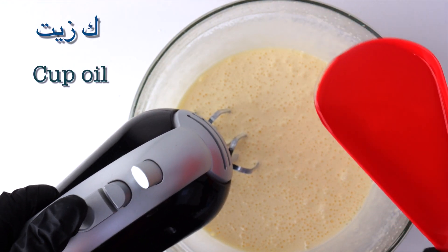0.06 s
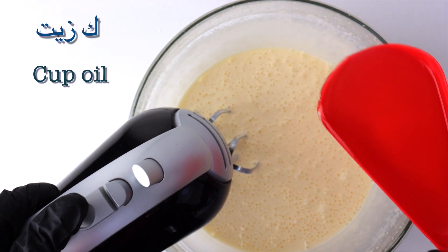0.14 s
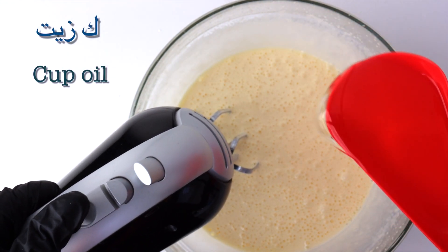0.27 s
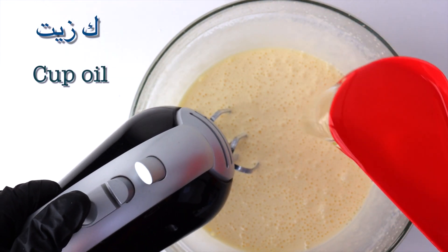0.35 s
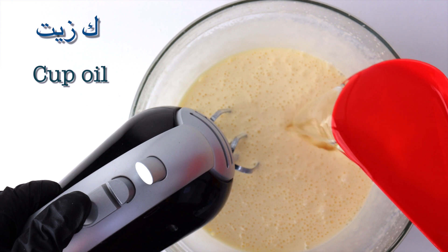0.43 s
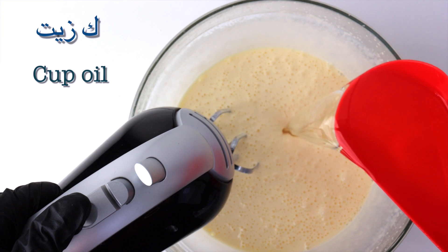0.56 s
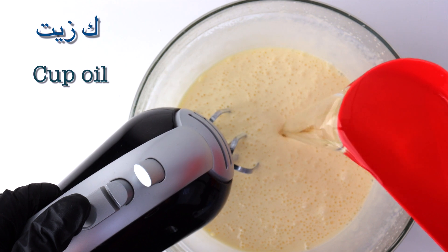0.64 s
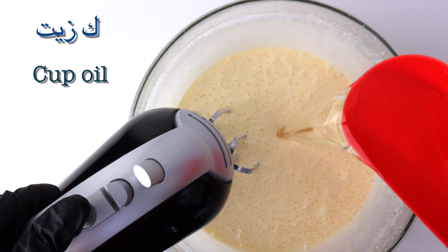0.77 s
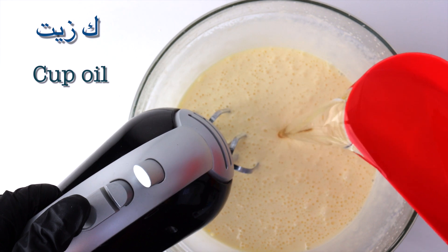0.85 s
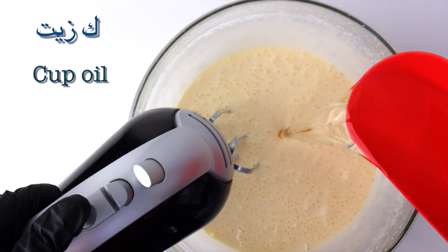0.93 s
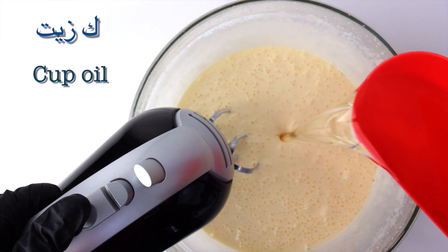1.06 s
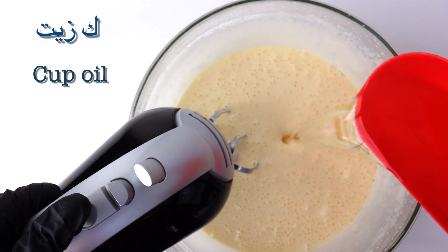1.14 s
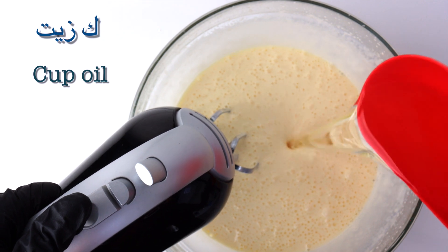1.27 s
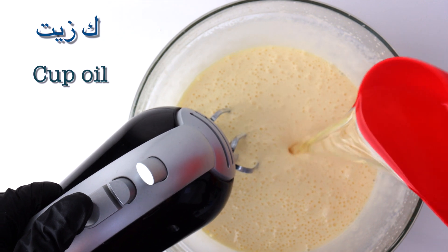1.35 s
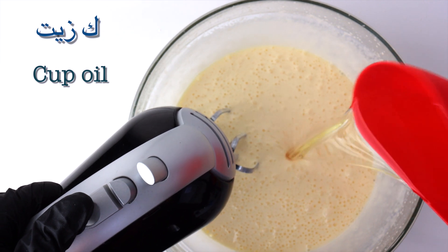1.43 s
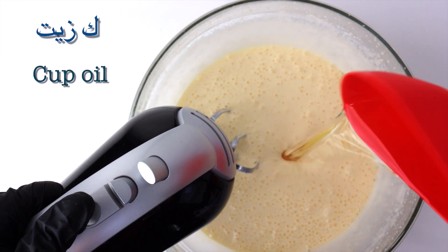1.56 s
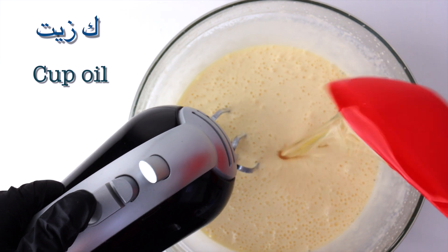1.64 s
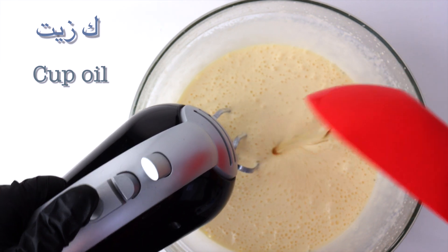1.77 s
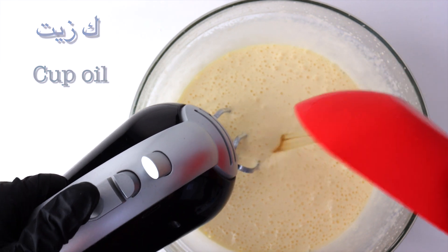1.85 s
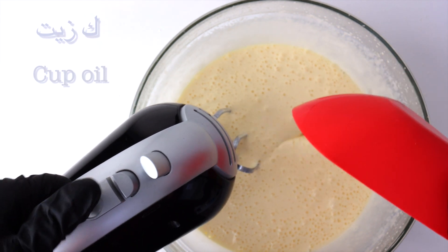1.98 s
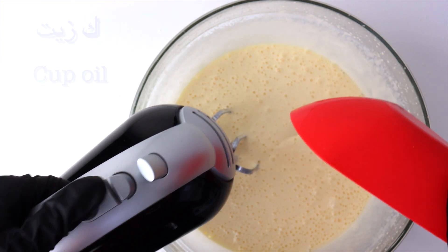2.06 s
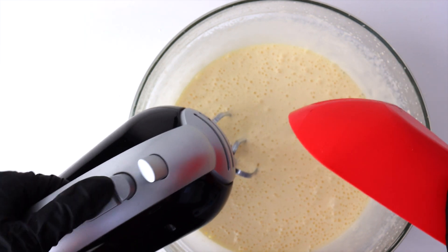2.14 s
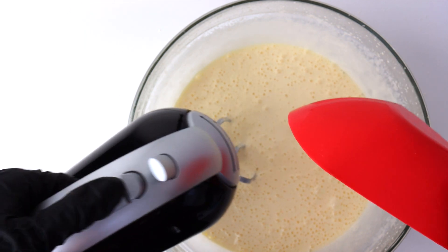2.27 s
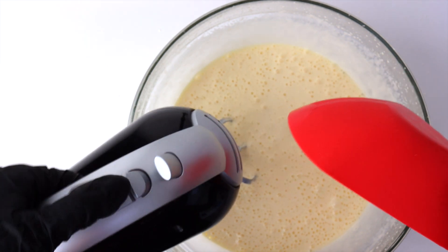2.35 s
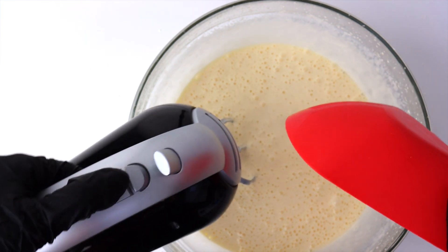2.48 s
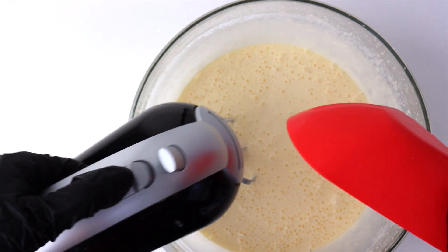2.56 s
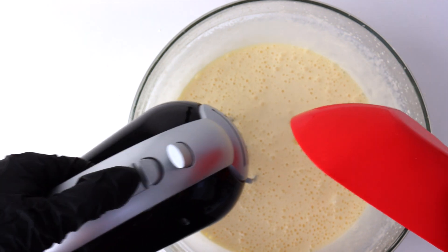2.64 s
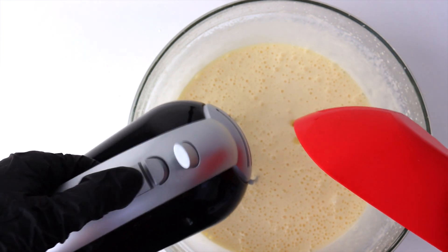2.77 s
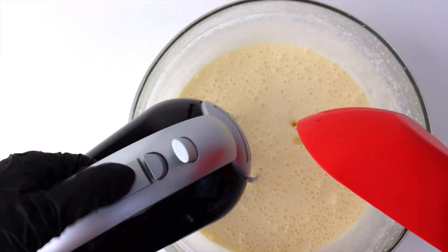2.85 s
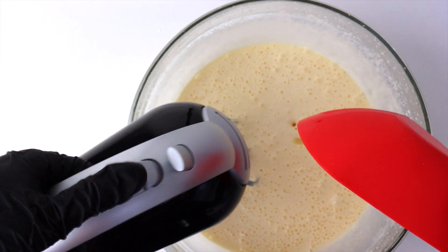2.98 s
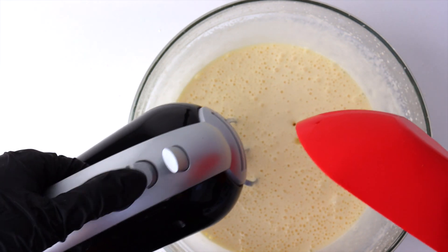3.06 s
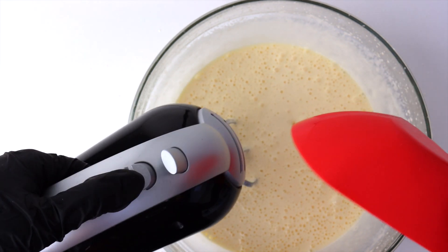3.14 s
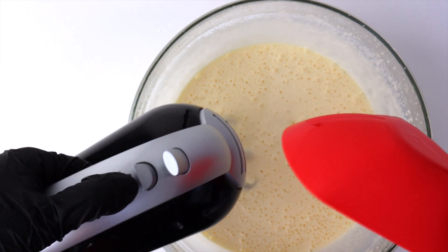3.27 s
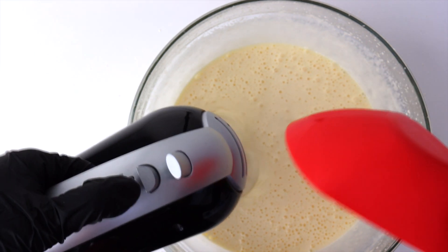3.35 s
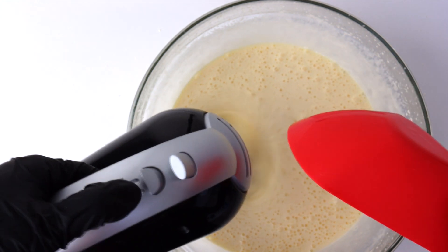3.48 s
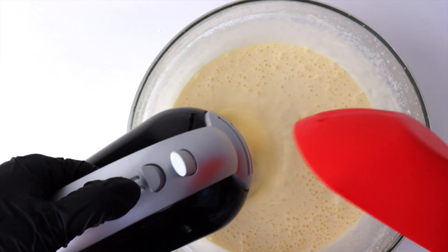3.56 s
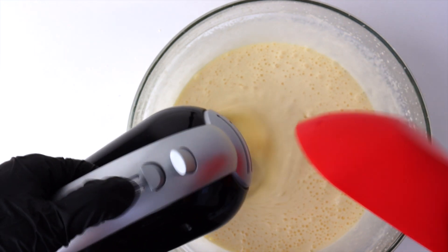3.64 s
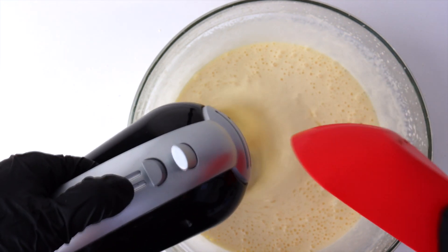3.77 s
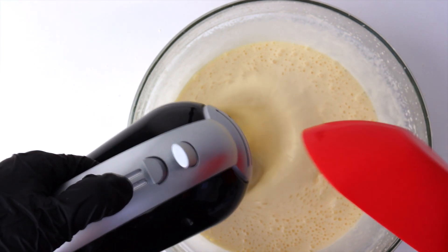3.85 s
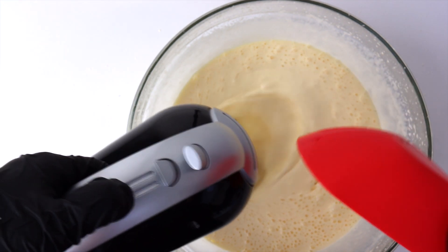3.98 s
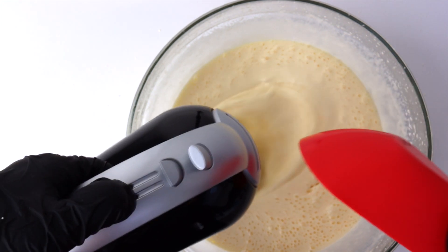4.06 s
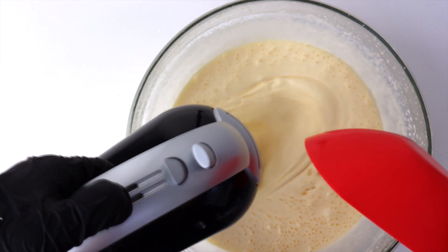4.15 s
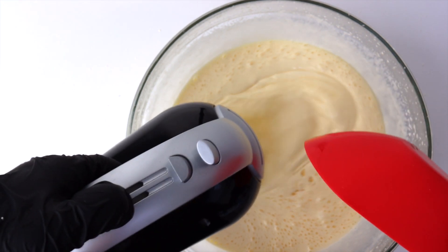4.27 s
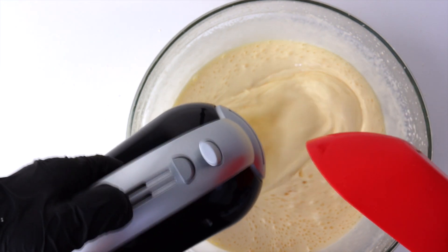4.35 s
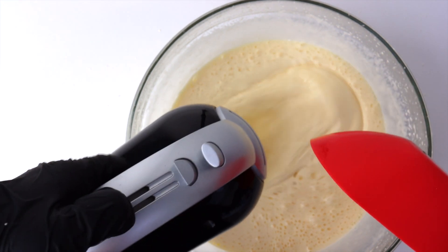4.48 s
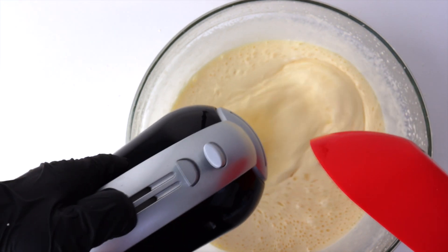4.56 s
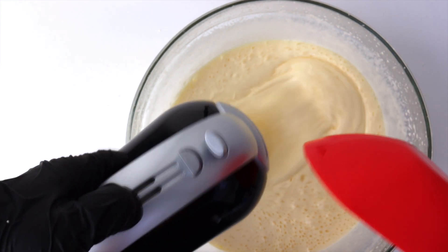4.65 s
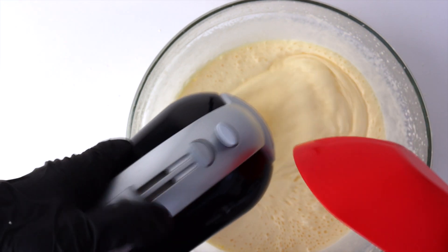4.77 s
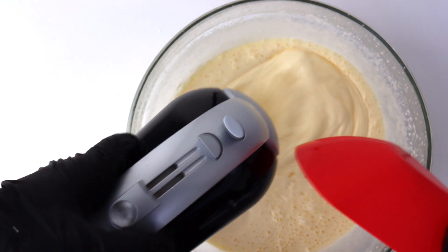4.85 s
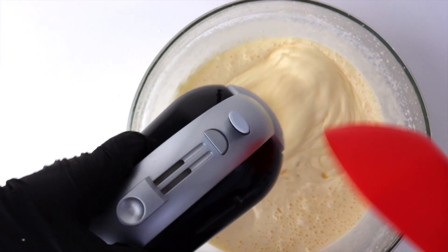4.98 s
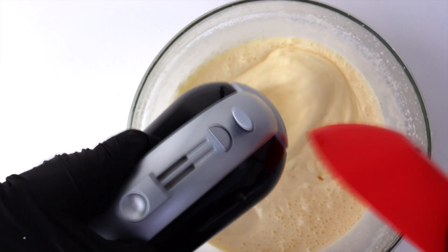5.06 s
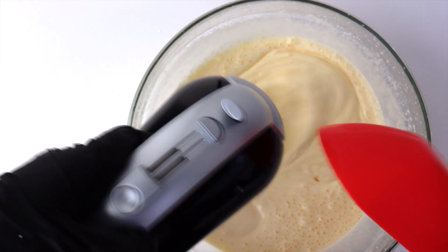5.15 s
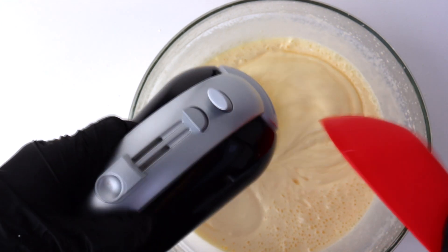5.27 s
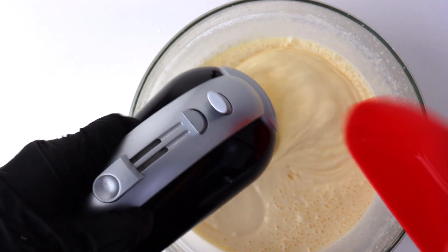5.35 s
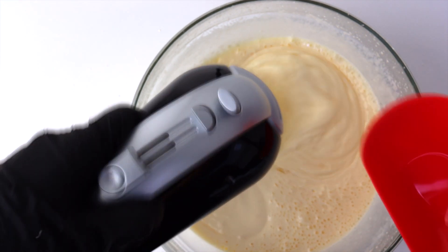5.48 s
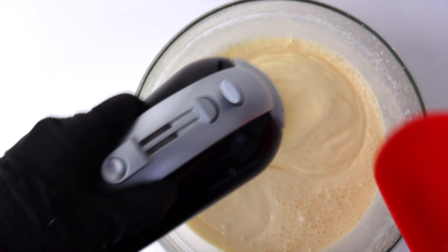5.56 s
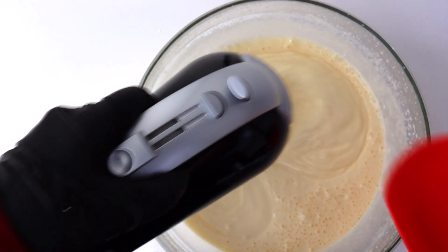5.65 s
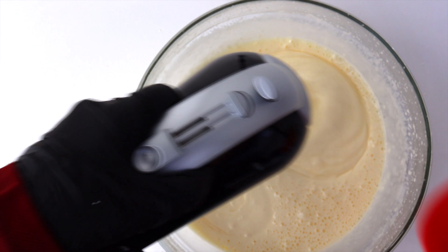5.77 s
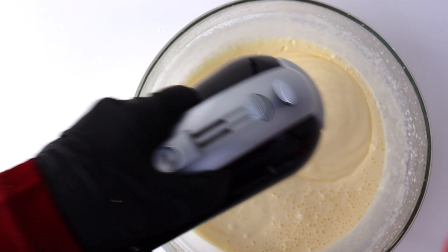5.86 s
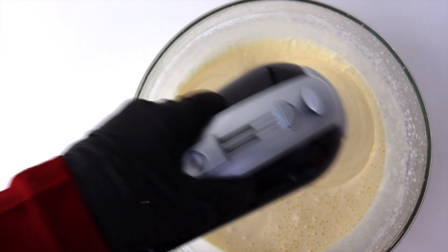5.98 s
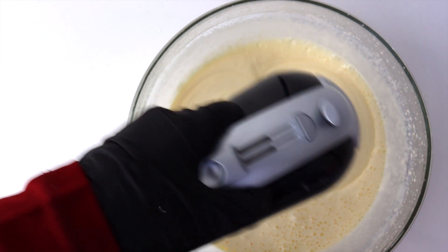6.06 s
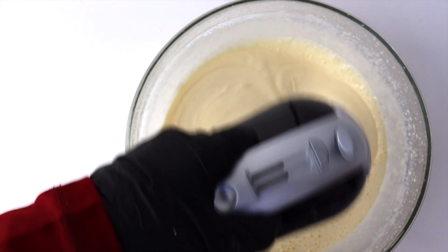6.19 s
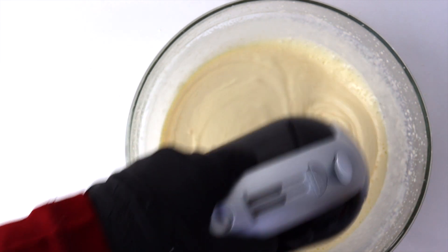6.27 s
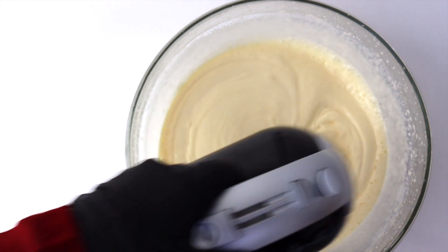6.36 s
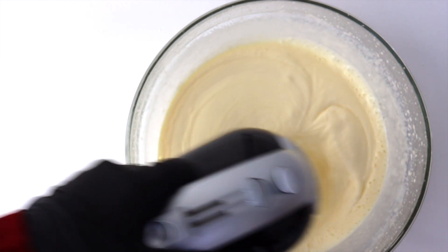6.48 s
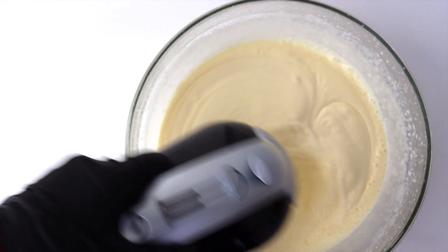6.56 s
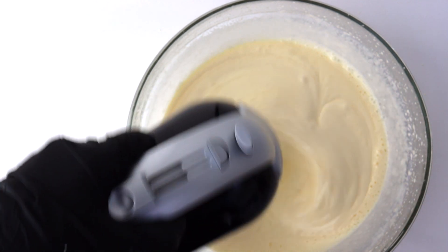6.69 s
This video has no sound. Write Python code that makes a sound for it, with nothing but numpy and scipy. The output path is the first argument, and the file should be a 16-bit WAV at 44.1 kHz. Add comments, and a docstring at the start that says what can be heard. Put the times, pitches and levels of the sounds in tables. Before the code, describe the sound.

A small, hard-walled kitchen heard close up, nearly quiet at first, with faint air noise and a low steady hum. A tiny tap and soft swish come near 0.5 s, then brief rustles at 1.1 and 1.3 s. Dull low glugs of poured oil follow around 1.4-1.7 s. Light plastic taps cluster at 2.2-3 s, the clearest near 2.6, with faint gurgles. At 3.2-3.3 s a switch snaps hard and the mixer bursts in, far louder. It sags briefly around 3.6, clicks again at 3.7, 3.95 and 4.1, and climbs with passing squeals, dips near 4.3, then rises toward a steady high whine with rushing, raspy fan noise. Batter thuds and rumbles beneath; beaters clatter on glass in fast runs, notably at 4.5, 4.85, 5.3, 5.6, 6 and 6.4 s. The motor is still running at the end.

```python
"""A small kitchen with a low hum, heard close up: oil is poured into batter in a glass bowl, then a hand mixer runs.
Short rustling swishes and plastic taps are shaped noise; the glugs of pouring are decaying low tones.
The mixer is clicked on and slid up through its speeds; its motor whines on multiples of its rotation.
Fan and brushes rasp as noise pulsing once a turn; geared-down beaters excite resonances of batter and glass."""
import sys
import numpy as np
from scipy import signal
from scipy.fft import rfft, irfft
from scipy.io import wavfile
from scipy.ndimage import uniform_filter1d

SR = 44100
rng = np.random.default_rng(int(sys.argv[2]) if len(sys.argv) > 2 else 0)


def wav_out(sig):
    """Save sig, one row per channel (or a flat mono array), as 16-bit PCM at SR to the path in sys.argv[1]."""
    wavfile.write(sys.argv[1], SR, np.round(np.clip(np.atleast_2d(sig).T, -1, 1) * 32767).astype(np.int16))


N = 296352
T = np.arange(N) / SR

# motor slider steps; the speed sags where the contact breaks: start_s, target_speed_hz, lag_s
SPEED_STEPS = [(3.28, 186, .085), (3.6, 165, .1), (3.7, 238, .1), (3.89, 276, .18), (4.12, 310, .155),
               (4.29, 280, .07), (4.385, 395.5, .45)]
# radiation of the motor tones by the housing: frequency_hz, gain_db
HOUSING_RESPONSE = [(1000, 0), (2900, 0), (3150, 5), (3400, 9), (3490, 8), (3560, 1), (3900, -1), (9300, 1),
                    (11000, -2), (14000, -12)]
# worm gear and bearing overtones: multiple_of_rotation, level_db
GEAR_OVERTONES = [(4, -43), (8, -42), (9, -38.5), (13, -45), (14, -48), (15, -46), (18, -43), (19, -51),
                  (20, -47), (21, -47), (22, -49), (23, -42), (25, -51), (26, -52), (27, -50), (30, -51)]
# commutator note: multiple_of_bar_rate, level_db, timing_roughness_turns
COMMUTATOR_TONES = [(1, 0, .009), (2, -3, .003), (3, -5, .004)]
# commutator tones meeting a resonance: multiple_of_bar_rate, motor_speed_hz, half_width_hz, boost_db
SQUEAL_SPEEDS = [(1, 174, 5, 13), (1, 220.5, 5, 29), (1, 290, 6, 13), (2, 322, 28, 11), (2, 382, 8, 9),
                 (3, 298, 24, 10)]
# radiation of the unbalance hum by the body: motor_speed_hz, level_db
UNBALANCE_RESPONSE = [(150, -42), (250, -38), (310, -25), (350, -22.5), (379, -21.5), (391, -28)]
# housing panel kept ringing by the running motor: frequency_hz, width_hz, gain_db
PANEL_MODES = [(2636, 14, 0)]
# spectrum of fan and brush noise: frequency_hz, density_db_per_hz
RASP_SPECTRUM = [(240, -20.5), (400, -8.5), (425, -3), (588, -2), (777, -12), (1040, -4), (1490, -3.5),
                 (2800, -11.5), (3420, -4.5), (3930, -10.5), (5270, -11.5), (8240, -22), (9320, -20),
                 (14400, -47), (16000, -45)]
# beaters on glass, resonances: frequency_hz, width_hz, gain_db
BEATER_MODES = [(936, 40, -6), (1076, 60, 4), (1260, 100, -9), (1520, 90, -1), (1800, 160, -8),
                (2080, 100, -2), (2400, 200, -8), (3350, 250, -11), (4100, 200, -9), (5200, 500, -17),
                (6950, 150, -10)]
# bowl of batter, resonances: frequency_hz, width_hz, gain_db
BATTER_MODES = [(110, 20, -3), (186, 26, 5.5), (230, 14, 2.5), (281, 30, -1), (312, 45, 1),
                (410, 27, -16.5), (441, 27, -9), (610, 120, -9)]
# chatter as the beaters are pushed around the bowl, relative to RATTLE_DB: time_s, level_db
CHATTER_LEVELS = [(3.36, -24), (3.65, -36), (3.85, -18), (4.4, -17), (4.85, -13), (5.1, -17), (5.35, -16.5),
                  (5.7, -17), (5.95, -44), (6.4, -33), (6.72, -40)]
# churning as the beaters move through the batter, shared by thuds and rumble: time_s, level_db
CHURN_LEVELS = [(3.32, -27.5), (3.39, -28.5), (3.4, -16.5), (3.57, -16.5), (3.59, -20.5), (4.2, -20.5),
                (4.26, -19.5), (4.3, -22), (5.0, -20.5), (5.13, -35.5), (5.32, -21.5), (5.57, -27),
                (5.6, -21.5), (5.9, -28), (6.34, -27.5), (6.41, -23.5), (6.67, -33.5), (6.72, -49)]
# spells of beaters on glass: start_s, length_s, peak_db (nominal), favoured_hz, every_second_blade_db
GLASS_CONTACTS = [(3.336, .03, -13, 1120, 0), (3.431, .07, -14, 1800, 0), (3.538, .13, -9.5, 2000, -2),
                  (3.78, .08, -14, 2640, 0), (3.892, .02, -8, 955, 0), (4.004, .06, -10, 1400, -1),
                  (4.354, .02, -8.5, 1030, 0), (4.506, .33, -11, 1100, 0), (4.851, .14, -5.5, 940, -7),
                  (5.284, .215, -7.5, 1080, -1.5), (5.592, .24, -7, 1060, -4), (5.988, .27, -11, 1520, -7),
                  (6.361, .1, -11.5, 2080, -5)]
# speed switch snapping over its detents: start_s, peak_db, tilt_db_per_octave, decay_s
SWITCH_SNAPS = [(3.208, -21.5, 0, .004), (3.275, -22, -1.5, .005), (3.2795, -4, -1.5, .003),
                (3.3037, -7, .5, .004), (3.3057, -1.5, .5, .004), (3.711, -5, 1.5, .005),
                (3.952, -12, 4, .003), (4.137, -12.5, 5, .0025)]
# spectrum of a switch snap: frequency_hz, density_db_per_hz
SNAP_SPECTRUM = [(180, -43), (300, -39), (593, -8), (978, -21), (1140, -7), (1410, -2), (2000, -14),
                 (3400, -6), (4670, -13.5), (5160, -8), (7440, -21), (11900, -22), (16000, -36)]
# light plastic taps from cup and handle: start_s, peak_db, tilt_db_per_octave, decay_s
PLASTIC_TAPS = [(.424, -31, 20.5, 0.0022), (.532, -40, 5.5, 0.0064), (1.928, -44, 25, 0.0013),
                (2.24, -36.5, 13, 0.008), (2.267, -24, 9, .012), (2.381, -47, -5, .004),
                (2.433, -42, -4.5, 0.012), (2.565, -41.5, -4, 0.0064), (2.613, -19, 7, 0.0046),
                (2.628, -27.5, 0, .011), (2.803, -42, 2, 0.015), (2.848, -49, 5, 0.023),
                (2.963, -49, 7, 0.0074)]
# spectrum of a plastic tap: frequency_hz, density_db_per_hz
TAP_SPECTRUM = [(240, -38), (400, -16), (660, 13.5), (828, -4), (1160, 10.5), (1310, 4), (2320, 8),
                (2700, 0.5), (3770, 1), (4130, -8), (6420, -14), (9520, -31), (15000, -49)]
# short swishes, like a rustling sleeve: start_s, level_db, rise_s, hold_s, decay_s, tilt_db_per_octave, resonance_hz
SWISHES = [(0.493, -45, 0.042, 0.046, 0.053, -1.5, 650), (1.112, -42, .01, 0.047, 0.061, 1.5, 2900),
           (1.319, -36, 0.012, 0.069, 0.072, 6, 5100), (1.386, -40.5, 0.0078, 0.046, 0.068, -3, 2300),
           (1.674, -59, 0.028, 0.079, 0.031, 0, 3300)]
# spectrum of a swish: frequency_hz, density_db_per_hz
SWISH_SPECTRUM = [(290, -39), (500, -5.5), (718, -0.5), (1120, -6), (1270, 2.5), (1830, -2), (2250, 1.5),
                  (4050, -2.5), (4790, -8), (6500, -20), (9090, -29.5), (14000, -51)]
# spells of dull gurgling: start_s, length_s, level_db, level_change_db, start_pitch_hz, end_pitch_hz
GURGLE_SPELLS = [(1.38, .14, -32.5, 4, 247.6, 210), (1.434, .2, -34.5, -0.5, 117, 111.5),
                 (1.55, 0.094, -39, -17, 302, 272), (2.27, 0.065, -41.5, -2, 229, 205),
                 (2.88, 0.048, -34.5, -3, 149.4, 142), (2.912, 0.051, -40.5, 2.5, 298, 394),
                 (3.091, .02, -41, 0, 171, 176)]
# spectrum of the kitchen air: frequency_hz, density_db_per_hz
AIR_SPECTRUM = [(47, 5.5), (80, 0), (152, -4), (194, -1.5), (316, -4.5), (471, -6), (702, -9.5),
                (839, -9.5), (1250, -8.5), (1950, -18), (7050, -29), (14000, -31), (16000, -39)]
# low kitchen hum: time_s, rms_db
HUM_LEVELS = [(0, -50.5), (1.5, -51), (2.1, -53), (3.2, -53), (4.5, -60)]

TURNS_PER_BLADE = 10.75
BARS = 12  # commutator bars passing the brushes each turn
FULL_SPEED_HZ = 395
# levels at full speed (dB) and their change with speed (dB per octave);
# brush tone and panel ring weaken as speed rises
AIR_DB, AIR_SLOPE_DB = -29.5, 3
SPARK_DB, SPARK_SLOPE_DB = -37.5, 2.5
GEAR_DB, GEAR_SLOPE_DB = 0, 9
BRUSH_DB, BRUSH_SLOPE_DB = -45, -8
PANEL_DB, PANEL_SLOPE_DB = -48, -8.5
# rumble relative to the churning (dB), and its change with speed (dB per octave)
RUMBLE_DB, RUMBLE_SLOPE_DB = -21.5, -7.5
# offsets to the level tables; brush change while the motor coasts (dB)
CHURN_DB, RATTLE_DB, COASTING_DB = 3.5, -6.5, -9
# unbalance hum offset and waver (dB); gear timing roughness (turns)
UNBALANCE_DB, UNBALANCE_WAVER_DB, GEAR_ROUGH_TURNS = -1, 1.5, .002
# spread of knock strength (dB); scrape decay and hold (s); top of the ring (Hz)
KNOCK_SCATTER_DB, KNOCK_DECAY_S, KNOCK_HOLD_S, KNOCK_TOP_HZ = 1.5, 0.0044, 0.0046, 8800
# glugs within a spell: rate (per s), decay (s), spread of pitch (octaves) and of strength (dB)
GLUGS_PER_S, GLUG_DECAY_S, GLUG_SCATTER_OCTAVES, GLUG_SCATTER_DB = 27, 0.036, 0.062, -0.5
# kitchen air level (dB), appliance hum pitch and low-pass corner (Hz)
KITCHEN_DB, KITCHEN_HUM_HZ, TOP_HZ = -55.5, 48.3, 15900


def mixer():
    """Common drive: one shaft phase times the motor sounds and, through a worm gear, the blades."""
    speed, coasting = motor_speed()
    octaves = np.log2(np.maximum(speed / FULL_SPEED_HZ, .4))
    churn_db, = curves(CHURN_LEVELS)
    turns = np.cumsum(speed * (1 + .0006 * walk(25))) / SR
    blade = turns / TURNS_PER_BLADE
    power = np.clip((T - 3.305) / .01, 0, 1)
    shaking = rumble(blade, octaves, churn_db)
    motor = whine(turns, speed, octaves, coasting) + rasp(turns, octaves)
    return power * (motor + rattle(blade) + churn(blade, churn_db) + shaking) + knocks(blade)


def motor_speed():
    """Exponential relaxation: speed closes in on each step's target, coasting when the target is lower."""
    speed, goal = np.zeros((2, N))
    for s, hz, lag in SPEED_STEPS:
        i = int(s * SR)
        speed[i:] = hz + (speed[i] - hz) * np.exp(-T[:N - i] / lag)
        goal[i:] = hz
    coasting = uniform_filter1d((goal < speed) * 1., size=SR // 20)
    return speed, coasting


def whine(turns, speed, octaves, coasting):
    """Rotational harmonics: unbalance once a turn, commutator at the bar rate, gear at shaft multiples."""
    # the brushes bounce, which roughens their note in timing and strength
    bounce = walk(220)
    commutator = np.zeros(N)
    for multiple, db, rough in COMMUTATOR_TONES:
        tone = partials(turns + rough * bounce, [(multiple * BARS, db)])
        commutator += squeal(multiple, speed) * tone
    commutator *= undb(BRUSH_DB + BRUSH_SLOPE_DB * octaves + COASTING_DB * coasting + 2 * walk(160))

    gear = partials(turns + GEAR_ROUGH_TURNS * bounce, GEAR_OVERTONES)
    gear *= undb(GEAR_DB + GEAR_SLOPE_DB * octaves)

    unbalance_db = UNBALANCE_DB + np.interp(speed, *np.transpose(UNBALANCE_RESPONSE))
    unbalance = undb(unbalance_db + UNBALANCE_WAVER_DB * walk(34)) * np.sin(2 * np.pi * turns)

    panel = unit(ring(rng.standard_normal(N), PANEL_MODES))
    panel *= undb(PANEL_DB + PANEL_SLOPE_DB * octaves)
    return unbalance + colour(commutator + gear, HOUSING_RESPONSE) + panel


def partials(turns, orders):
    """Phase locking: each tone is a multiple of the shaft angle and wavers in strength."""
    return sum(undb(db - .7 + 2.5 * walk(12)) * np.sin(2 * np.pi * k * turns) for k, db in orders)


def squeal(multiple, speed):
    """Resonance crossing: a commutator tone swells as the speed sweeps through a resonance."""
    gain = 1
    for k, hz, width, db in SQUEAL_SPEEDS:
        if k == multiple:
            gain = gain + undb(db) / (1 + ((speed - hz) / width) ** 2) ** 1.5
    return gain


def rasp(turns, octaves):
    """Amplitude modulation: fan and brush noise pulses once a turn, sparks do not; both grow with speed."""
    source = rng.standard_normal(N) + 0.7 * unit(grains(2500, 0.7))
    source *= (1 + 0.26 * np.cos(2 * np.pi * turns)) * undb(1.26 * walk(40))
    air = colour(source, RASP_SPECTRUM)
    # the air level is set by its treble
    air /= np.std(band(air, 4500, 14000))
    sparks = unit(band(grains(6000, 1.7), 8300, 13800))
    return air * undb(AIR_DB + AIR_SLOPE_DB * octaves) + sparks * undb(SPARK_DB + SPARK_SLOPE_DB * octaves)


def rattle(blade):
    """Impact excitation: beaters chatter in their sockets each time a blade takes the load."""
    chatter_db, = curves(CHATTER_LEVELS)
    load = .55 + np.exp(-(blade % 1) / .25) * undb(2 * walk(35))
    chatter = grains(3500, 2) * load
    return unit(band(ring(chatter, BEATER_MODES), 990, 8000)) * undb(chatter_db + RATTLE_DB)


def churn(blade, churn_db):
    """Modal response: blades slap the batter, and folds and air pockets thud in the bowl."""
    stroke = 0.42 + np.exp(-(blade % 1) / 0.93)
    thuds = ring(grains(900, 0.81) * stroke, BATTER_MODES)
    return unit(band(thuds, 90, 523)) * undb(churn_db + CHURN_DB)


def rumble(blade, octaves, churn_db):
    """Forced vibration: the blades shake the counter at their own rate, with low noise added."""
    shake = np.sin(2 * np.pi * blade) + 0.85 * unit(band(rng.standard_normal(N), 8.2, 180))
    return unit(shake) * undb(churn_db + RUMBLE_DB + RUMBLE_SLOPE_DB * octaves)


def knocks(blade):
    """Periodic impact: every passing blade knocks on the glass, alternate blades often weaker."""
    out = np.zeros(N)
    for s, length, db, hz, second_db in GLASS_CONTACTS:
        first, last = np.interp([s, s + length], T, blade)
        times = np.interp(np.arange(first, last), blade, T)
        for k, at in enumerate(times):
            hit = knock(hz)
            strength_db = db + k % 2 * second_db + KNOCK_SCATTER_DB * rng.standard_normal()
            add(out, at, hit * undb(strength_db))
    return out


def knock(hz):
    """Modal excitation: a brief scrape rings the glass, the place of contact favouring some modes."""
    contact = burst(KNOCK_DECAY_S, hold=KNOCK_HOLD_S) * np.minimum(T[:SR // 2] / .001, 1)
    hit = band(ring(contact, BEATER_MODES), 820, KNOCK_TOP_HZ)
    hit = hit + ring(hit, [(hz, hz / 3, 4)])
    # a ringing knock peaks well above its early rms
    return hit / (3.23 * np.std(hit[:SR // 80]))


def clicks(table, spectrum):
    """Impulsive contact: blows on stiff plastic are short, coloured bursts of noise."""
    out = np.zeros(N)
    for s, db, tilt_db, decay in table:
        hit = colour(burst(decay), spectrum, tilt_db)
        add(out, s, hit / np.abs(hit).max() * undb(db))
    return out


def swishes():
    """Filtered noise: a rustle swells and fades, lifted around one resonance."""
    out = np.zeros(N)
    t = T[:SR // 2]
    for s, db, rise, hold, decay, tilt_db, hz in SWISHES:
        swish = colour(burst(decay, hold), SWISH_SPECTRUM, tilt_db)
        swish = swish + ring(swish, [(hz, hz / 6, 0)])
        swish /= np.std(swish[:int(hold * SR)])
        add(out, s, swish * np.minimum(t / rise, 1) * undb(db))
    return out


def gurgles():
    """Successive bubble oscillations: regular glugs glide in pitch and change in level over a spell."""
    out = np.zeros(N)
    for s, length, db, change_db, hz, end_hz in GURGLE_SPELLS:
        for after in np.arange(0, length, 1 / GLUGS_PER_S):
            pitch, size = rng.standard_normal(2)
            part = after / length
            glug_hz = (hz + (end_hz - hz) * part) * 2 ** (GLUG_SCATTER_OCTAVES * pitch)
            add(out, s + after, glug(glug_hz) * undb(db + change_db * part + GLUG_SCATTER_DB * size))
    return out


def glug(hz):
    """Damped oscillation: an air pocket wobbles as a tone with band noise, and dies away."""
    t = T[:SR // 2]
    wobble = unit(band(rng.standard_normal(len(t)), hz * .5, hz * 1.25))
    swell = (1 - np.exp(-t / 0.0073)) * np.exp(-t / GLUG_DECAY_S)
    return swell * (np.sin(2 * np.pi * hz * t) + 0.7 * wobble)


def room(x, t60, wet_db):
    """Reverberation: hard kitchen walls return an exponentially decaying, duller tail."""
    t = T[:SR // 2]
    tail = band(rng.standard_normal(len(t)), 213, 8000) * np.exp(-np.log(1000) * t / t60)
    tail *= t > .006
    return x + undb(wet_db) * signal.fftconvolve(x, tail / np.linalg.norm(tail))[:N]


def kitchen():
    """Stationary background: faint coloured air noise and a low appliance hum at one pitch."""
    hum_db, = curves(HUM_LEVELS)
    air = unit(colour(rng.standard_normal(N), AIR_SPECTRUM)) * undb(KITCHEN_DB + .5 * walk(5.2))
    # a sine of rms 1 has a peak of root two
    return air + np.sqrt(2) * undb(hum_db) * np.sin(2 * np.pi * KITCHEN_HUM_HZ * T)


def undb(db):
    """Logarithmic level: decibels to amplitude gain."""
    return 10 ** (np.asarray(db) / 20)


def unit(x):
    """Normalization: scale to rms 1."""
    return x / np.sqrt(np.mean(x ** 2))


def curves(table):
    """Linear interpolation: the columns of a table joined by straight lines in time."""
    s, *columns = np.transpose(table)
    return [np.interp(T, s, c) for c in columns]


def walk(rate):
    """Smoothed random process: chance steps at a rate per second, averaged twice, with spread near 1."""
    k = int(SR / rate)
    steps = np.repeat(rng.standard_normal(N // k + 1), k)
    return 1.56 * uniform_filter1d(uniform_filter1d(steps, k), k)[:N]


def colour(x, points, tilt_db=0):
    """Minimum-phase filtering: a causal response through (Hz, dB) points, tilted in dB per octave."""
    hz, db = np.transpose(points)
    octave = np.log2(np.maximum(np.fft.rfftfreq(2048, 1 / SR), 1))
    gain_db = np.interp(octave, np.log2(hz), db + tilt_db * np.log2(hz / hz[0]))
    # folding the cepstrum onto positive time makes the response causal
    cepstrum = irfft(np.log(undb(gain_db)))
    half = len(cepstrum) // 2
    cepstrum[1:half] *= 2
    cepstrum[half + 1:] = 0
    response = irfft(np.exp(rfft(cepstrum)))
    return signal.fftconvolve(x, response)[:len(x)]


def band(x, lo_hz, hi_hz):
    """Band limitation: a Butterworth band-pass."""
    sections = signal.butter(2, [lo_hz, min(hi_hz, SR / 2 - 1)], "band", fs=SR, output="sos")
    return signal.sosfilt(sections, x)


def ring(x, modes):
    """Modal superposition: parallel resonances, each (Hz, width Hz, dB)."""
    return sum(undb(db) * signal.lfilter(*signal.iirpeak(hz, hz / width, SR), x + 1e-18)
               for hz, width, db in modes)


def grains(rate, spread_db):
    """Shot noise: random impulses of scattered size at a mean rate per second."""
    return (rng.random(N) < rate / SR) * rng.standard_normal(N) * undb(spread_db * rng.standard_normal(N))


def burst(decay, hold=0):
    """Transient envelope: half a second of contact noise that holds, then dies away exponentially."""
    t = T[:SR // 2]
    return rng.standard_normal(len(t)) * np.exp(-np.maximum(t - hold, 0) / decay)


def add(out, s, x):
    """Superposition: mix x in at time s."""
    i = int(s * SR)
    out[i:i + len(x)] += x[:N - i]


def scene():
    """Superposition: mixer, plastic, swishes and glugs share the room; the background is added dry."""
    close = mixer() + clicks(SWITCH_SNAPS, SNAP_SPECTRUM) + clicks(PLASTIC_TAPS, TAP_SPECTRUM)
    close = close + swishes() + gurgles()
    heard = room(close, t60=.28, wet_db=-15)
    return (heard + kitchen())[None]


def record(dry):
    """Limited range: full scale bounds the peaks, then a steep low-pass cuts the top."""
    lowpass = signal.ellip(10, .2, 70, TOP_HZ, fs=SR, output="sos")
    return signal.sosfilt(lowpass, np.clip(dry, -1, 1))


dry = scene()
out = record(dry)
wav_out(out)
```